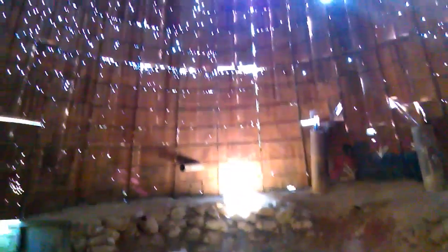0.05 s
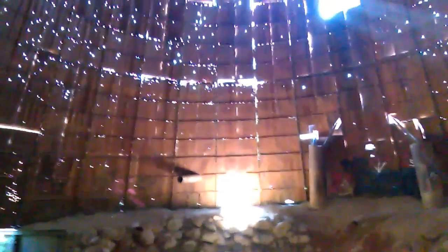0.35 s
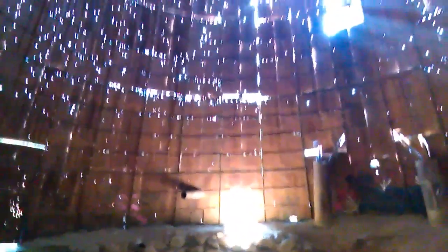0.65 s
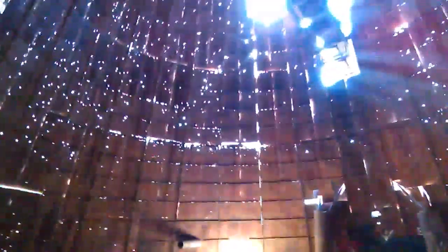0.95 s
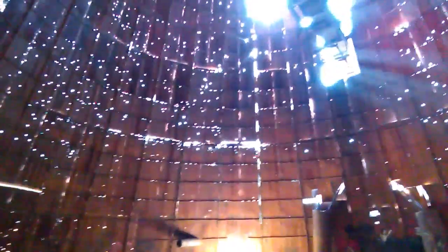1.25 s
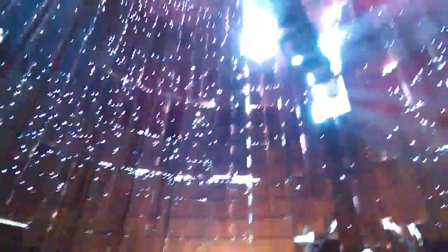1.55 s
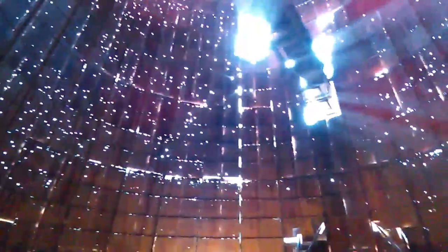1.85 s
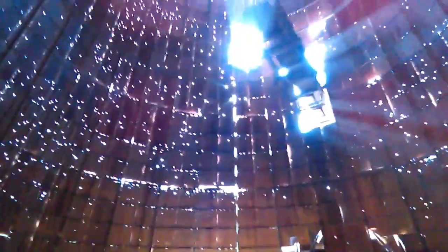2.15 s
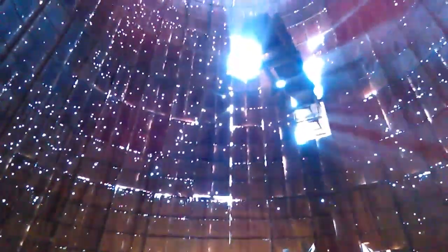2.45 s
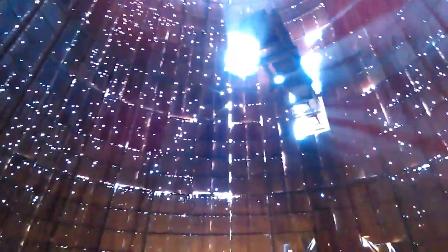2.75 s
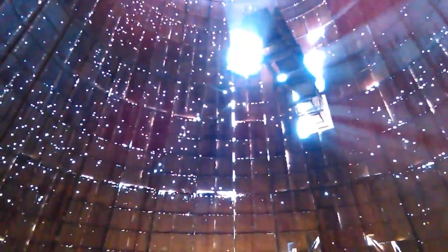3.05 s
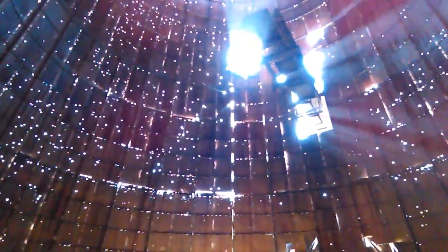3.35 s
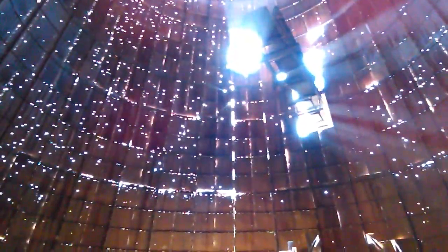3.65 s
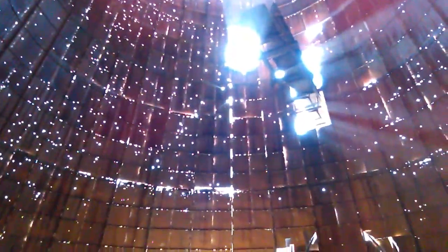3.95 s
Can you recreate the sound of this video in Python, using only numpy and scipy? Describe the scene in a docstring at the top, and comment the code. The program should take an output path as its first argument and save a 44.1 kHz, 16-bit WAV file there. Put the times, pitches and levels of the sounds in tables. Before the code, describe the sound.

Bangs and knocks on metal boom and echo inside a vast, hollow steel dome.

```python
"""First comes the fading boom of a bang inside a huge, empty steel dome; more knocks on metal follow.
Each blow lands with a gritty crunch and a short clang, sets the steel shell ringing and leaves a
long, dark echo. Two tiny ticks, a low background rumble and the microphones' hiss fill the quiet,
with a soft microphone-handling bump near the end."""
import sys
import numpy as np
from scipy import signal
from scipy.fft import rfft, irfft, next_fast_len
from scipy.io import wavfile
from scipy.ndimage import map_coordinates

SR = 44100
rng = np.random.default_rng(int(sys.argv[2]) if len(sys.argv) > 2 else 0)


def write(x):
    x = np.atleast_2d(x).T
    wavfile.write(sys.argv[1], SR, np.round(np.clip(x, -1, 1) * 32767).astype(np.int16))


N = 176400

# Each struck sheet rings with its own tones: f/Hz, level/dB, fade/s (time to fall by 60 dB)
SHEET_EARLY = [(210, -51, 0.77), (439, -44, 2), (753, -47, 2.4)]
SHEET_HARD = [(355.6, -32, 0.41), (464, -59, 1.2), (628, -39, 0.98), (840, -42.5, 1.36), (954, -41, 1.5),
              (1200, -47, .9), (1346, -52, 1), (1900, -47, 0.18), (2230, -61, 0.2)]
SHEET_DEEP = [(250, -47, 4.2), (323, -38, 2.04), (367, -44, 2.74), (523, -40.5, 1.98), (668, -28, 0.23),
              (815, -55, 0.56), (1275, -46, 0.71), (2450, -55, 0.4)]
SHEET_BRIGHT = [(298, -45, 0.94), (322.7, -46, 1.1), (334, -47, 1.44), (358, -49.5, 1.7), (384, -49.5, 1.9),
                (648, -48.5, 0.57), (1340, -53.5, 0.57), (1700, -55, 0.59), (1950, -53.5, 0.44),
                (4960, -60, 0.2), (5100, -66, 0.24), (6350, -59, .15), (6630, -54, 0.12)]
SHEET_DULL = [(209, -41, 0.59), (291, -45, 1.2), (320, -47.5, 0.87), (393, -47.5, 0.66), (511, -42, 0.38),
              (931, -52, 0.55)]
SHEET_SHARP = [(147.3, -50.5, 1.7), (205.6, -50, 3.33), (216, -51, 2.45), (291.5, -44.5, 0.99),
               (322, -47.5, 0.96), (511, -51.5, 1.3), (589, -48, 1.02), (641, -46.5, 1.4),
               (1020, -49, 0.75), (1900, -47, 0.13), (2135, -58, 0.67), (2490, -41, 0.11),
               (2620, -58.5, 0.48)]
# The blows: t/s, echo bass/dB, echo middle/dB, echo treble/dB, boom/dB, shell/dB, clang/dB,
# clang brightness/dB, tones of the struck sheet
BLOWS = [(-.3, -29, -29.5, -27, -36.5, -42, -30, 0, SHEET_EARLY),
         (.154, -33.5, -35.5, -29.5, -37.5, -38, -22.5, 4.5, SHEET_HARD),
         (.776, -38.5, -34, -35.5, -43, -36.5, -23.5, -1.5, SHEET_DEEP),
         (1.61, -67, -58.5, -51, -60.5, -60.5, -58.5, 16, []),
         (1.917, -41, -47.5, -44.5, -70, -54.5, -40, 8, SHEET_BRIGHT),
         (2.398, -45.5, -45.5, -43, -55.5, -53, -44, 7, SHEET_DULL),
         (2.6, -44.5, -45, -39.5, -60, -57.5, -34.5, -2, SHEET_SHARP)]
# How alike left and right sound: f/Hz, likeness (1 = the same)
LIKENESS = [(60, 0.94), (280, 1), (640, 0.74), (1400, 0.47), (3000, 0.2), (10000, 0.2)]


def amp(db):
    """Turn decibels into a factor to multiply by."""
    return 10 ** (np.asarray(db) / 20)


def unit(x):
    """Scale x to an average power of 1."""
    return x / np.sqrt(np.mean(x ** 2) + 1e-20)


def along(points, hz):
    """Read between (f/Hz, value) points, spaced by octaves."""
    f, values = np.transpose(points)
    return np.interp(np.log(hz + 1), np.log(f + 1), values)


def wobble(rate, size):
    """A smooth curve through `rate` random values a second."""
    values = rng.standard_normal(int(size * rate / SR) + 4)
    return map_coordinates(values, [np.arange(size) * rate / SR], order=2)


def filtered(x, response):
    """Multiply each frequency in x by response(hz)."""
    size = x.shape[-1]
    padded = next_fast_len(size + 4096, True)
    hz = np.fft.rfftfreq(padded, 1 / SR)
    return irfft(rfft(x, padded) * response(hz), padded)[..., :size]


def noise(spectrum, size):
    """Stereo noise with the given spectrum; left and right nearly match in the bass."""
    def shares(hz):
        angle = np.arccos(np.clip(along(LIKENESS, hz), 0, .995)) / 2
        return amp(along(spectrum, hz)) * [np.cos(angle), np.sin(angle)]
    common, opposite = filtered(rng.standard_normal((2, size)), shares)
    return unit(np.array([common + opposite, common - opposite]))


def dying(x, fades, attack_s, hold_s=0, build_s=0):
    """Rise, hold, then fade each frequency at its own speed; build_s makes the bass swell late."""
    hz, t, bands = signal.stft(x, SR, nperseg=256)
    hz = hz[:, None]
    swell_s = 1e-5 + build_s * 200 / (hz + 100)
    swell = 1 - np.exp(-(t + 1e-3) / swell_s)
    fade = amp(-60 * np.maximum(t - hold_s, 0) / along(fades, hz))
    _, y = signal.istft(bands * swell * fade, SR, nperseg=256)
    return y * (1 - np.exp(-np.arange(y.shape[1]) / SR / attack_s))


def ring(tones, attack_s, size, waver=0.61, waver_rate=15):
    """Fading tones of metal; each wavers like close pitches beating, the higher ones faster."""
    t = np.arange(size, dtype=np.float32) / SR
    out = np.zeros((2, size), np.float32)
    for hz, db, fade_s in tones:
        curves = rng.standard_normal((2, 256))
        start, side = rng.standard_normal(2)
        age = t[:int(fade_s * SR)]
        position = age * waver_rate * (hz / 300) ** .5
        sin_drift, cos_drift = [waver * np.interp(position, np.arange(256), c) for c in curves]
        spread = np.sign(side) * np.arccos(np.clip(along(LIKENESS, hz), 0, 1)) / 2
        cycles = hz * np.arange(len(age)) / SR + start
        phase = np.float32(2 * np.pi * (cycles % 1) + [[spread], [-spread]])
        level = amp(db - 60 * age / fade_s) / np.sqrt(1 + waver ** 2)
        out[:, :len(age)] += level * ((1 + sin_drift) * np.sin(phase) + cos_drift * np.cos(phase))
    return out * (1 - np.exp(-t / attack_s))


def add(out, start_s, x):
    """Mix x into out at start_s, dropping what falls outside."""
    i = round(start_s * SR)
    x = x[..., max(-i, 0):N - i]
    out[:, max(i, 0):][:, :x.shape[-1]] += x


def echoes(flutter_db=1.4, flutter_rate=36.2):
    """The dome answers every blow with a dense echo whose bass lasts longest."""
    # The echo's dark sound: f/Hz, level/dB
    spectrum = [(20, -10), (45, -10), (80, -1.5), (112, -6.5), (145, -0.5), (175, -12.5), (210, -0.5),
                (240, -6.5), (330, 2), (480, -0.5), (700, -4.5), (1100, -8.5), (1400, -13.5), (2200, -25.5),
                (3200, -37.5), (6000, -45), (16000, -55)]
    # How long it lasts: f/Hz, fade/s
    fades = [(60, 3.55), (130, 2.7), (200, 3.24), (330, 1.88), (600, 2.36), (1100, 1.92), (2000, 1.55),
             (3000, 0.93), (8000, 0.14)]
    out = np.zeros((2, N))
    for start_s, bass_db, middle_db, treble_db, *_ in BLOWS:
        colour = [(110, bass_db), (300, middle_db), (600, middle_db), (1800, treble_db)]
        tail = filtered(noise(spectrum, N), lambda hz: amp(along(colour, hz)))
        flutter = amp(flutter_db * wobble(flutter_rate, N))  # curved walls bunch the echo into swells
        add(out, start_s, dying(tail * flutter, fades, attack_s=0.023, build_s=0.02))
    return out


def ringing_steel():
    """A blow sets off the dome's deep boom and rings the whole shell and the struck sheet."""
    # The dome's deepest tones: f/Hz, level/dB, fade/s
    boom_tones = [(48.8, -7, 4.4), (78, -11, 4.9), (88, -1.5, 4.9), (100, -11.5, 4.6)]
    # The shell's higher tones: f/Hz, level/dB, fade/s
    shell_tones = [(125, -16, 2.3), (146.7, -14, 2.5), (162.7, -15.5, 3.5), (211.7, -10, 2.6),
                   (279.5, -6.5, 1.8), (324.8, -0.5, 1.72), (374, -9, 2.35), (436, -15, 2.8),
                   (597, -6, 2.38), (830, -16, 2.2), (928, -14, 1.1), (995, -11, 1.8)]
    out = np.zeros((2, N))
    for start_s, _, _, _, boom_db, shell_db, _, _, sheet_tones in BLOWS:
        size = N - round(start_s * SR)
        boom = amp(boom_db) * ring(boom_tones, attack_s=0.027, size=size)
        shell = amp(shell_db) * ring(shell_tones, attack_s=0.0076, size=size)
        sheet = ring(sheet_tones, attack_s=0.016, size=size)
        add(out, start_s, boom + shell + sheet)
    return out


def rumble():
    """A low background rumble eases off, with small swells and a soft late microphone-handling bump."""
    # The rumble's deep sound: f/Hz, level/dB
    spectrum = [(15, -21), (40, -1.5), (75, 0.5), (130, -2), (250, -5), (600, -13), (1500, -34.5),
                (4000, -51)]
    # Its loudness over time: t/s, level/dB
    levels = [(0, -45), (1.2, -53), (1.55, -49.5), (1.95, -57.5), (2.3, -60), (3.4, -56.5), (3.82, -63),
              (3.94, -60.5), (4, -61)]
    times, db = np.transpose(levels)
    return amp(np.interp(np.arange(N) / SR, times, db)) * noise(spectrum, N)


def crunches(grain_db=3, grain_rate=700):
    """Rust and grit crushed under a blow give a short, grainy spray of treble."""
    # Each crunch: t/s, level/dB, hold/s, tilt towards the highest treble/dB
    events = [(0.153, -51.5, 0.04, 0), (0.178, -49, 0.0083, 2), (0.773, -52, 0.026, -2.5),
              (0.808, -53.5, 0.02, -6), (1.61, -56.5, 0.016, -2.5), (1.658, -62.5, 0.041, -6),
              (1.729, -66.5, 0.013, -8.5), (1.914, -53.5, 0.017, 2), (1.928, -50.5, 0.013, -3.5),
              (2.394, -55, 0.0091, -3.5), (2.411, -49, 0.0096, -4), (2.44, -59.5, 0.0087, -4),
              (2.598, -41.5, 0.0095, -3), (2.688, -62, 0.015, -8)]
    # The sound of grit: f/Hz, level/dB
    spectrum = [(200, -35), (1000, 16.5), (2500, 2), (4000, -3.5), (5500, -0.5), (7500, -1.5), (10500, 4),
                (13000, 0.5), (16000, -8.5)]
    # How long it lasts: f/Hz, fade/s
    fades = [(2000, 0.2), (5000, .17), (10000, 0.087)]
    out, size = np.zeros((2, N)), SR // 3
    for start_s, db, hold_s, tilt_db in events:
        tilt = [(3000, -tilt_db), (11000, tilt_db)]
        spray = filtered(noise(spectrum, size), lambda hz: amp(along(tilt, hz)))
        grains = unit(amp(grain_db * wobble(grain_rate, size)))
        add(out, start_s, amp(db) * dying(spray * grains, fades, attack_s=0.0016, hold_s=hold_s))
    return out


def clangs():
    """Struck metal gives a crowd of short tones, so close together that they blur into noise."""
    # The clang's sound: f/Hz, level/dB
    spectrum = [(40, -23), (130, 0), (220, 7.5), (350, 5), (600, 3), (1000, 0), (1400, -6.5), (2000, -11.5),
                (2600, -23), (3300, -32), (6000, -50), (16000, -68)]
    # How long it lasts: f/Hz, fade/s
    fades = [(150, 0.19), (600, 0.26), (2000, 0.27), (6000, 0.067)]
    out = np.zeros((2, N))
    for start_s, *_, db, bright_db, _ in BLOWS:
        tilt = [(400, -bright_db / 2), (2000, bright_db)]
        burst = filtered(noise(spectrum, SR // 2), lambda hz: amp(db + along(tilt, hz)))
        add(out, start_s, dying(burst, fades, attack_s=0.0005, build_s=0.024))
    return out


def ticks():
    """Grit clicks on the steel and leaves a faint ring."""
    # Each tick: t/s, click level/dB, click fade/s, ring level/dB
    events = [(2.332, -51, 0.0063, -74), (2.917, -54.5, 0.021, -64)]
    # The dry click: f/Hz, level/dB
    spectrum = [(300, -25), (1900, 13), (4000, 4), (6500, 2), (10000, -28), (16000, -28)]
    # The faint ring: f/Hz, level/dB, fade/s
    tones = [(2044, 0, .04), (2800, -2, .05), (4930, -12, .3), (6000, -13, .15)]
    out, t = np.zeros((2, N)), np.arange(SR // 10) / SR
    for start_s, db, fade_s, ring_db in events:
        add(out, start_s, amp(db - 60 * t / fade_s) * noise(spectrum, len(t)))
        add(out, start_s, amp(ring_db) * ring(tones, attack_s=0.0016, size=SR // 2))
    return out


def scene():
    """The sounds reach the left microphone first; all but the highest treble is louder on the right."""
    # Balance between the sides: f/Hz, left minus right/dB
    balance = [(60, -1), (380, -1.1), (700, -2), (1300, -7.5), (2400, -10), (4400, -7.5), (8000, -3.5),
               (15000, 2.5)]
    # The left side's head start: f/Hz, lead/ms
    lead = [(300, 0.22), (700, 0.13), (1200, 0.28), (2000, 0.41), (5000, 0.39)]
    dome = echoes() + clangs() + ringing_steel() + crunches() + ticks() + rumble()
    sides = np.array([[.5], [-.5]])

    def placement(hz):
        early_s = sides * along(lead, hz) / 1000
        return amp(sides * along(balance, hz)) * np.exp(2j * np.pi * hz * early_s)
    return filtered(dome, placement)


def record(dry):
    """The microphones add their own hiss, louder on the right; the very highest treble is cut off."""
    # The hiss: f/Hz, level/dB
    spectrum = [(100, 6), (1000, 5), (2000, 2.5), (4000, -2), (7000, -4), (11000, -5), (15500, -7.5)]
    hiss_db, right_extra_db, top_hz = -68, 6.5, 15850
    hiss = unit(filtered(rng.standard_normal((2, N)), lambda hz: amp(along(spectrum, hz))))
    hiss *= amp(hiss_db + right_extra_db * np.array([[-.5], [.5]]))
    return filtered(dry + hiss, lambda hz: hz < top_hz)


dry = scene()
out = record(dry)
write(out)
```